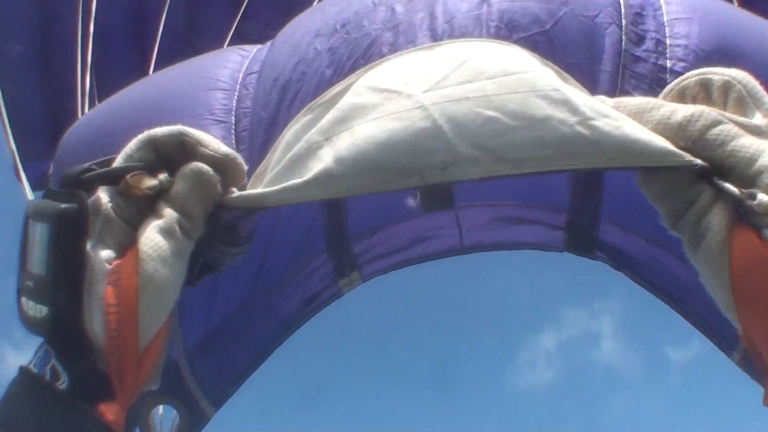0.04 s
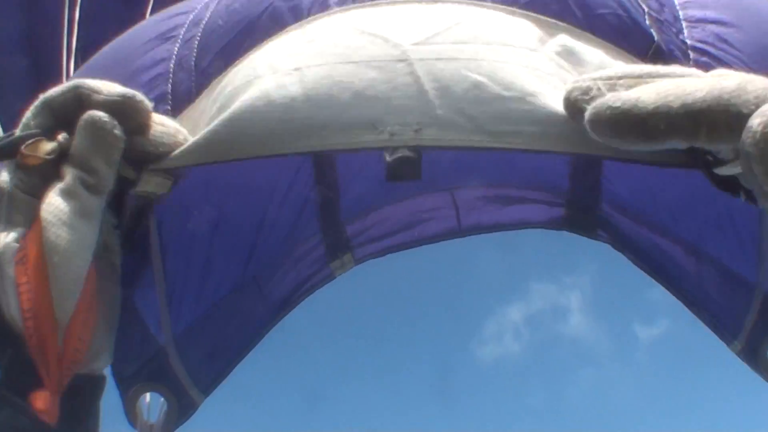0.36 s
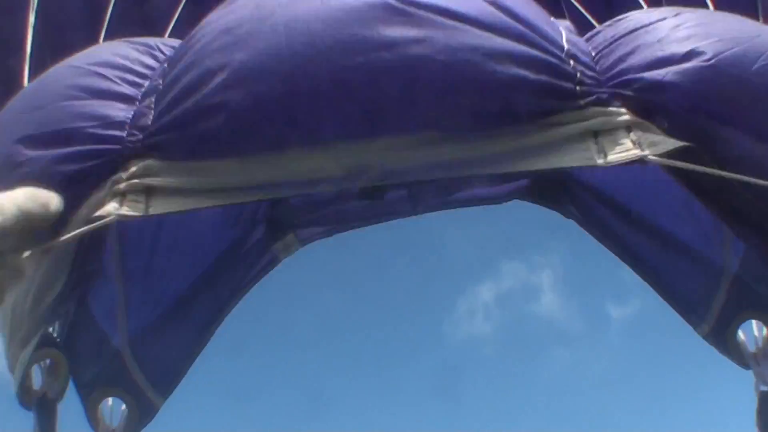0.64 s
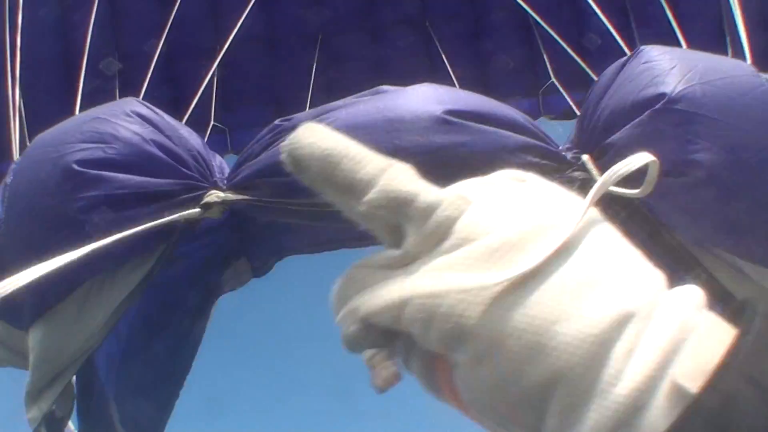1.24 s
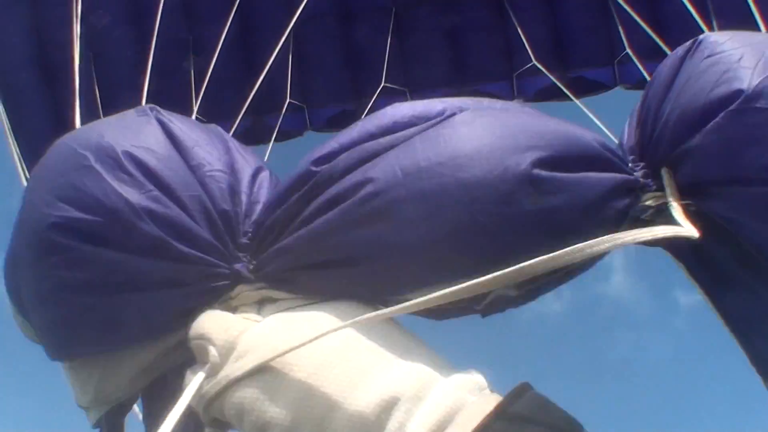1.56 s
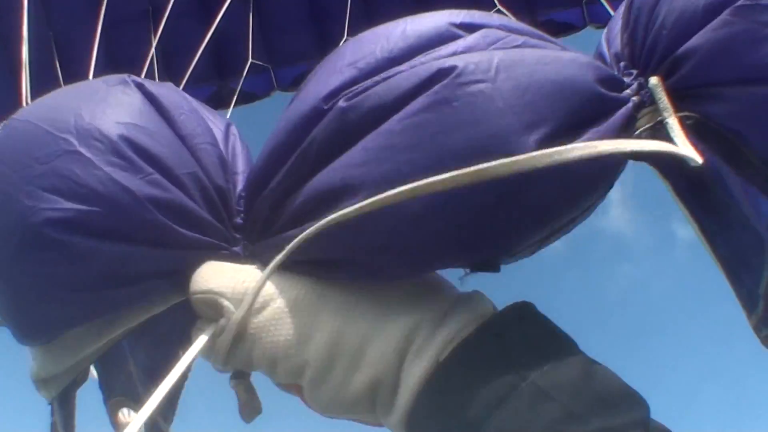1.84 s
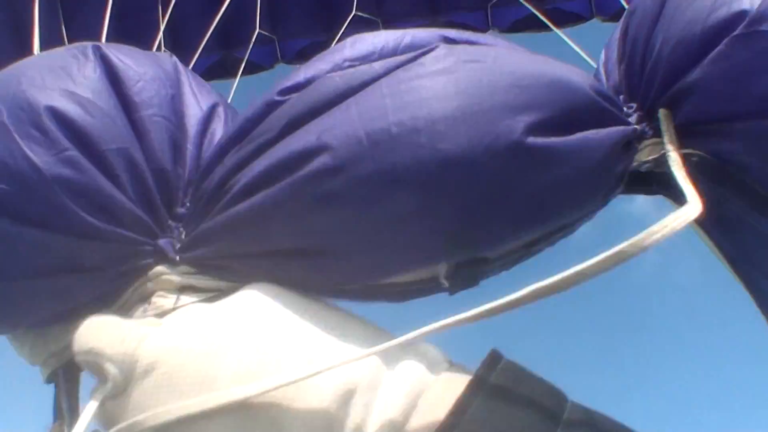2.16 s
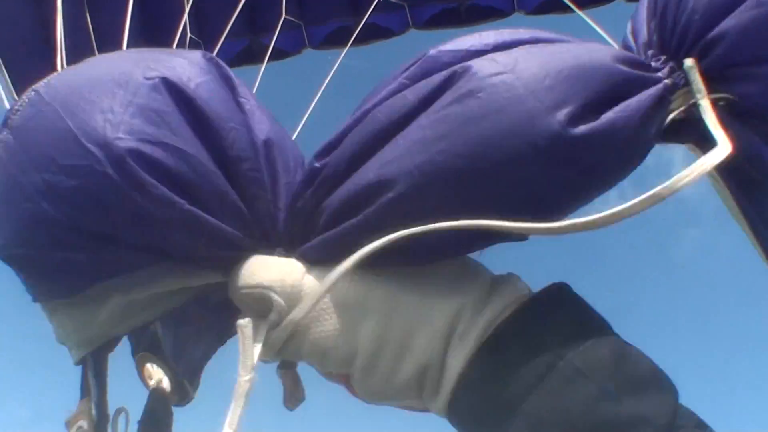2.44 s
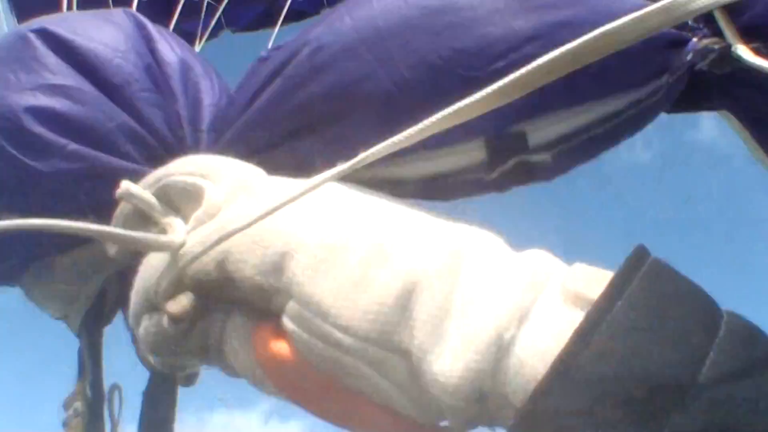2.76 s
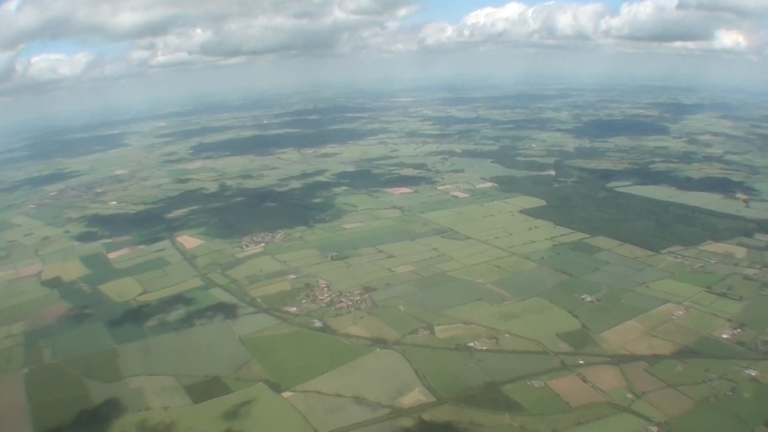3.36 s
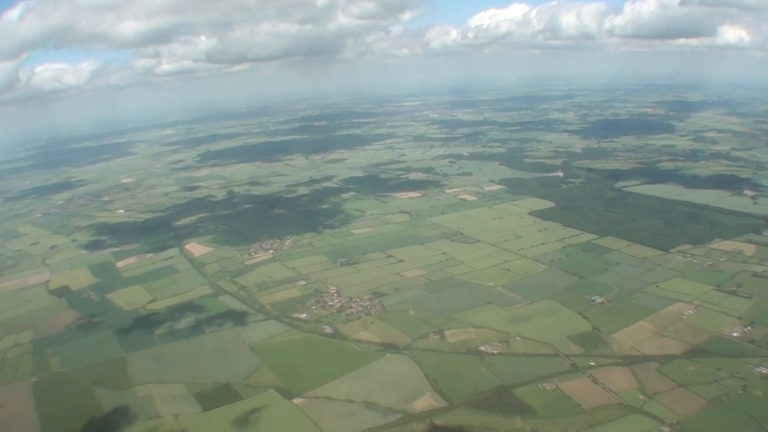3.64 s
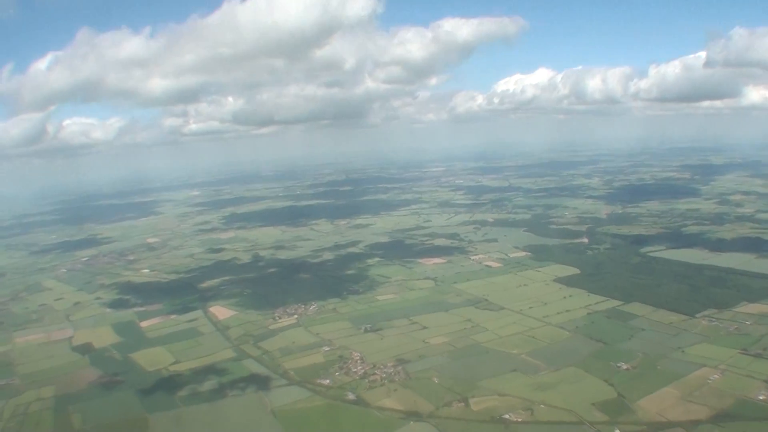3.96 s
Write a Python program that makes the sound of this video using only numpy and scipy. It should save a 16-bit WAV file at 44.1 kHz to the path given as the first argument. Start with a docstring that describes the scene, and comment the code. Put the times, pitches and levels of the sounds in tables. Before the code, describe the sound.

Wind buffets a small microphone under an open parachute. The sputtering roar drops to a low rumble with short puffs, faint glove rubs on nylon, dull knocks and light metal clicks, then returns with a hollow tone and brighter hiss.

```python
"""Under an open parachute, air buffets the two ports of a small camera microphone. It opens on a strong
roar, brighter and more sputtery the harder the flow, with short dry spits in the wind. From 0.9 s the
microphone is sheltered: short puffs pass, gloves rub the nylon and knock the gear, metal fittings click.
Near 2.9 s the roar returns, and open air brings in a hollow note and a brighter hiss.
A deep rumble and a soft air hiss lie under it all."""
import sys
import numpy as np
from scipy import signal
from scipy.fft import rfft, irfft, next_fast_len
from scipy.io import wavfile
from scipy.ndimage import map_coordinates

SR = 44100
rng = np.random.default_rng(int(sys.argv[2]) if len(sys.argv) > 2 else 0)


def wav_out(sig):
    """Save sig, one row per channel (or a flat mono array), as 16-bit PCM at SR to the path in sys.argv[1]."""
    wavfile.write(sys.argv[1], SR, np.round(np.clip(np.atleast_2d(sig).T, -1, 1) * 32767).astype(np.int16))


N = 176400

# airflow over the microphone in the opening, the lull and the return: time_s, strength_db
FLOW_OPENING = [(0, -17.5), (.36, -18.5), (.47, -25), (.585, -26.5), (.645, -18), (.73, -16.5),
                (.79, -19.5), (.87, -21.5), (.897, -27), (.92, -47)]
FLOW_SHELTERED = [(1.15, -50.5), (1.45, -47.5), (1.7, -40), (1.9, -40), (2.2, -40), (2.225, -31.5),
                  (2.36, -29.5), (2.48, -38.5), (2.66, -31.5), (2.74, -41), (2.86, -44.5)]
FLOW_RETURN = [(2.88, -26), (2.93, -24.5), (3.07, -21.5), (3.2, -23.5), (3.38, -24), (3.54, -28),
               (3.72, -24.5), (3.93, -21.5), (4, -23)]
# single puffs on top of that flow: peak_s, half_length_s, strength_db
PUFFS = [(.884, 0.0066, -18.5), (1.045, 0.0079, -32.5), (1.275, 0.032, -37.5), (1.316, 0.0083, -34),
         (1.578, 0.016, -30), (1.608, 0.0043, -22.5), (1.69, 0.004, -30), (1.754, 0.0075, -28.5),
         (1.932, 0.009, -24), (1.967, 0.012, -18), (2.0, 0.0098, -17), (2.057, 0.012, -21),
         (2.104, 0.0099, -21.5), (2.158, 0.011, -29), (2.214, 0.0081, -22), (2.31, 0.0063, -27),
         (2.443, 0.0033, -24.5), (2.794, 0.0071, -30.5), (2.882, 0.0039, -21), (2.94, 0.019, -16),
         (3.009, 0.0035, -20), (3.143, 0.02, -18.5)]
# tone of the roar at full flow: freq_hz, gain_db
ROAR_EQ = [(20, -64), (60, -15.5), (110, -4.5), (200, 0.5), (400, -1), (750, -6), (1400, -15.5),
           (2800, -28.5), (7000, -43), (10500, -55), (15500, -77)]
# how steeply each band of the roar follows the flow: freq_hz, db_per_flow_db
ROAR_GROWTH = [(120, 0.74), (300, 0.77), (800, 1.1851), (3000, 1.24), (12000, 2)]
# flutter from eddies, before open air smooths it: freq_hz, depth_db
FLUTTER_DEPTH = [(100, 0), (400, 2.3), (1500, 3.5), (6000, 4.5)]
# stereo width of the wind: freq_hz, side_over_mid_db
WIND_WIDTH = [(100, -14.5), (220, -5.5), (450, -0.5), (1000, 1.2), (2500, -1), (6000, -6.5), (13000, -19)]
# phase offset between the ports, as side running a quarter cycle ahead of mid: freq_hz, side_share
SIDE_LEAD = [(250, 0.24), (650, -0.39)]
# tone of eddies breaking on the ports: freq_hz, gain_db
CRACKLE_EQ = [(300, -5), (1000, 7.5), (3000, -2.5), (7000, -9), (10500, -26.5), (15500, -34)]
# tone of the large eddies: freq_hz, gain_db
RUMBLE_EQ = [(22, -25), (60, 0), (110, 4), (170, -0.5), (320, -22), (900, -80)]
# fader ride of the rumble: time_s, level_db
RUMBLE_LEVEL = [(.17, -28.5), (.5, -49), (.82, -27), (1.05, -42.5), (1.3, -30.5), (1.45, -37.5),
                (1.75, -31), (2.93, -28.5), (3.2, -42), (4, -61)]
# tone of open air across the camera body: freq_hz, gain_db
HOLLOW_EQ = [(100, -18), (175, 11.5), (340, 10.5), (480, -10), (1000, -45)]

# short dry ticks and spits in the wind: start_s, level_db
SPITS = [(0.425, -19), (0.441, -17), (0.523, -25), (0.531, -27), (0.573, -25), (1.0435, -29),
         (2.2087, -18.5), (2.214, -19.5), (2.9832, -16)]
# tone of the crack in spits and clicks: freq_hz, gain_db
CRACK_EQ = [(300, 0), (1800, 10.5), (4000, 2), (7500, -3), (9500, -21), (15000, -39)]
# glove and cord knocking on the gear: start_s, level_db, pitch_hz
KNOCKS = [(0.9641, -19, 650), (1.0041, -13, 346), (1.8203, -14, 950), (2.207, -7.5, 330)]
# metal fittings clicking on the risers: start_s, level_db, tilt_db_per_octave
CLICKS = [(0.9654, -20.5, -2.5), (2.7061, -15, 1), (2.723, -33, 5.5)]
# ringing modes of a fitting: pitch_hz, gain_db
FITTING_MODES = [(1820, -0.5), (2350, -4), (3100, 2.5), (3850, -0.5), (4650, -6.5), (6500, -7.5)]
# glove strokes on nylon: peak_s, half_length_s, level_db
RUBS = [(.99, 0.0093, -45.5), (1.105, 0.01, -44.5), (2.0, 0.007, -31), (2.058, 0.0024, -29.5),
        (2.223, 0.0086, -37), (2.45, 0.0074, -37.5), (2.635, 0.046, -46), (2.945, 0.0047, -32)]
# tone of rubbed nylon: freq_hz, gain_db
NYLON_EQ = [(500, -2), (1500, 7), (4000, 4), (7500, -1), (10000, -19), (15500, -36)]

# tone of the air around the canopy: freq_hz, gain_db
CANOPY_HISS_EQ = [(600, 15), (3000, 9.5), (5600, 3), (7700, 3.5), (9500, -15.5), (15000, -28)]
# fader ride of the canopy hiss: time_s, level_db
CANOPY_HISS_LEVEL = [(0, -42), (.95, -52.5), (1.4, -52), (2.1, -47.5), (2.8, -45), (4, -49)]
# brighter tone once the camera faces the open air: freq_hz, gain_db
OPEN_HISS_EQ = [(800, 2.5), (2200, 9), (5500, -3), (7500, 0), (9500, -7), (11700, -11.5), (13300, -25),
                (15500, -46)]
# fader ride of that hiss, which also sets how exposed the ports are: time_s, level_db
OPEN_AIR_LEVEL = [(2.85, -63), (2.95, -60), (3.15, -48), (3.3, -39.5), (4, -40)]
# narrow stereo width of hiss and short noises: freq_hz, side_over_mid_db
NARROW_WIDTH = [(1000, -9), (3500, -11), (13000, -13)]


def roar(flow_db, open_air, smoothing=0.23, eddies_per_s=110, sputters_per_s=480):
    """Turbulence on the ports: treble swells and flutters more than bass; open air eases the flutter."""
    shared_eddies = wobble(eddies_per_s) + wobble(sputters_per_s)
    out = np.zeros((2, N))
    for hz, band in octave_bands(noise(ROAR_EQ, WIND_WIDTH)):
        depth_db = along(FLUTTER_DEPTH, hz) * (1 - smoothing * open_air)
        flutter = amp(depth_db * unit(shared_eddies + wobble(sputters_per_s)))
        out += band * unit(flutter) * amp(along(ROAR_GROWTH, hz) * flow_db)
    return amp(-15.5) * out


def crackle(flow_db, open_air, ticks_per_s=215, scatter_db=3, db_per_flow_db=1.72):
    """Eddies break on the ports in millisecond ticks: loud in strong flow, softened in open air."""
    onsets = rng.random(N) < ticks_per_s / SR
    ticks = onsets * amp(scatter_db * np.clip(rng.standard_normal(N), -2, 2))
    tick_shape = np.hanning(SR // 900)
    envelope = np.sqrt(np.abs(signal.fftconvolve(ticks ** 2, tick_shape ** 2, "same")))
    sputter = stereo(envelope * rng.standard_normal((2, N)), CRACKLE_EQ, WIND_WIDTH)
    return (1 - open_air / 2) * amp(-35.5 + db_per_flow_db * flow_db) * sputter


def hollow_note(flow_db, open_air):
    """Open air across the camera body sounds a hollow note that swells with the flow."""
    return open_air * amp(-23 + flow_db) * noise(HOLLOW_EQ, WIND_WIDTH)


def rumble():
    """Large eddies give the wind its low-end weight."""
    return amp(curve(RUMBLE_LEVEL)) * noise(RUMBLE_EQ, WIND_WIDTH)


def spits(t60_s=0.0082):
    """Dry ticks and spits in the wind, a few milliseconds long, perhaps from fabric."""
    envelope = sum(amp(db) * strike(start_s, t60_s) for start_s, db in SPITS)
    return envelope * noise(CRACK_EQ, NARROW_WIDTH)


def knocks(decay_cycles=5):
    """Glove and cord bump the gear: dull tones that die within a few cycles."""
    return sum(amp(db) * ring(start_s, hz, decay_cycles / hz) for start_s, db, hz in KNOCKS)


def clicks(t60_s=0.0094, crack_boost_db=5.5):
    """Metal fittings strike with a tiny crack and a short ring; each click has its own brightness."""
    crack_noise = noise(CRACK_EQ, NARROW_WIDTH)
    lowest_hz = FITTING_MODES[0][0]
    out = np.zeros((2, N))
    for start_s, db, tilt in CLICKS:
        ringing = sum(amp(mode_db + tilt * np.log2(hz / lowest_hz)) * ring(start_s, hz, t60_s)
                      for hz, mode_db in FITTING_MODES)
        crack = amp(crack_boost_db) * crack_noise * strike(start_s, t60_s / 2)
        out += amp(db) * (ringing + crack)
    return out


def rubs(grain_db=4, grains_per_s=600):
    """Gloves drag over nylon in short, grainy strokes."""
    grain = unit(amp(grain_db * wobble(grains_per_s)))
    return np.sqrt(swell_power(RUBS)) * grain * noise(NYLON_EQ, NARROW_WIDTH)


def hiss():
    """The bed: dull air noise around the canopy and the brighter rush of open air."""
    canopy = amp(curve(CANOPY_HISS_LEVEL)) * noise(CANOPY_HISS_EQ, NARROW_WIDTH)
    rush = amp(curve(OPEN_AIR_LEVEL)) * noise(OPEN_HISS_EQ, NARROW_WIDTH)
    return canopy + rush


def amp(db):
    """Decibels to gain."""
    return 10 ** (np.asarray(db) / 20)


def unit(x):
    """Normalise to rms 1."""
    return x / np.sqrt(np.mean(x ** 2) + 1e-20)


def along(points, hz):
    """Read (freq_hz, value) points at hz on a log frequency axis."""
    freqs, values = np.transpose(points)
    return np.interp(np.log(hz + 1), np.log(freqs + 1), values)


def curve(points):
    """Automation through (time_s, value) points, one value per sample."""
    return np.interp(np.arange(N) / SR, *np.transpose(points))


def swell_power(rows, rise=0.94, fall=1.35):
    """Summed power of bell-shaped swells that rise faster than they fall."""
    t = np.arange(N) / SR
    power = np.zeros(N)
    for peak_s, half_s, db in rows:
        width_s = half_s * np.where(t < peak_s, rise, fall)
        power += amp(db) ** 2 * np.exp(-((t - peak_s) / width_s) ** 2)
    return power


def strike(start_s, t60_s, attack_s=0.00022):
    """Percussive envelope: abrupt attack, exponential decay."""
    age_s = np.clip(np.arange(N) / SR - start_s, 0, 1)
    return (1 - np.exp(-age_s / attack_s)) * amp(-60 * age_s / t60_s)


def ring(start_s, hz, t60_s):
    """One struck, damped mode."""
    return strike(start_s, t60_s) * np.sin(2 * np.pi * hz * (np.arange(N) / SR - start_s))


def wobble(knots_per_s):
    """Smooth random modulation."""
    knots = rng.standard_normal(N // 8)
    return map_coordinates(knots, [np.arange(N) * knots_per_s / SR], mode="wrap")


def filtered(x, response):
    """EQ x with a gain given as a function of frequency."""
    size = next_fast_len(N + 8192)
    return irfft(rfft(x, size) * response(np.fft.rfftfreq(size, 1 / SR)), size)[..., :N]


def octave_bands(x, count=9):
    """Split x into overlapping bands that add back up to it: centre_hz, signal."""
    centres_hz = 50 * 2.0 ** np.arange(count)
    for centre_hz, solo in zip(centres_hz, np.eye(count)):
        yield centre_hz, filtered(x, lambda hz: along(np.c_[centres_hz, solo], hz))


def stereo(pair, eq, width):
    """Colour two unrelated signals and mix them as mid and side into left and right, rms 1."""
    def mid_side_matrix(hz):
        side = amp(along(width, hz))
        lead = np.clip(along(SIDE_LEAD, hz), -1, 1)
        shared, apart = 1j * lead * side, np.sqrt(1 - lead ** 2) * side
        gain = amp(along(eq, hz)) / np.hypot(1, side)
        return gain * np.array([[1 + shared, apart], [1 - shared, -apart]])
    return unit(filtered(pair, mid_side_matrix).sum(axis=1))


def noise(eq, width):
    """Coloured stereo noise of rms 1."""
    return stereo(rng.standard_normal((2, N)), eq, width)


def scene(full_flow_db=-20):
    """One airflow, steady part plus puffs, drives roar, hollow note and crackle; the rest layers in."""
    steady_db = curve([*FLOW_OPENING, *FLOW_SHELTERED, *FLOW_RETURN])
    flow_db = 10 * np.log10(amp(steady_db) ** 2 + swell_power(PUFFS)) - full_flow_db
    open_gain = amp(curve(OPEN_AIR_LEVEL))
    open_air = open_gain / open_gain.max()  # 1 = fully exposed
    wind = roar(flow_db, open_air) + hollow_note(flow_db, open_air) + rumble()
    sputter = crackle(flow_db, open_air)
    return wind + sputter + hiss() + rubs() + spits() + clicks() + knocks()


def record(dry, ceiling=0.8, top_hz=15800):
    """The microphone rounds off the largest peaks and keeps nothing above its band limit."""
    rounded = dry / (1 + (dry / ceiling) ** 6) ** (1 / 6)
    return filtered(rounded, lambda hz: hz < top_hz)


dry = scene()
out = record(dry)
wav_out(out)
```